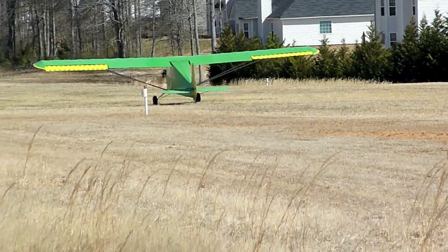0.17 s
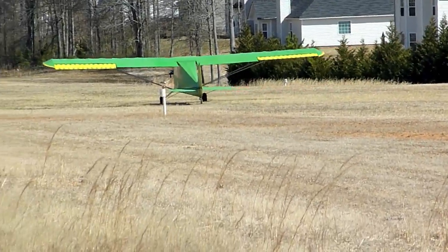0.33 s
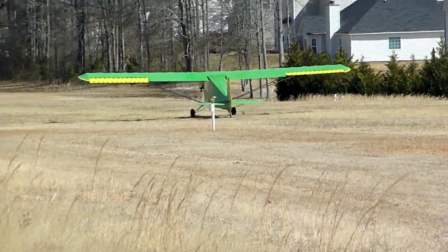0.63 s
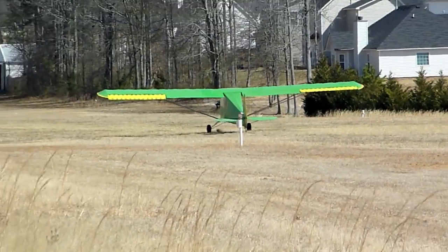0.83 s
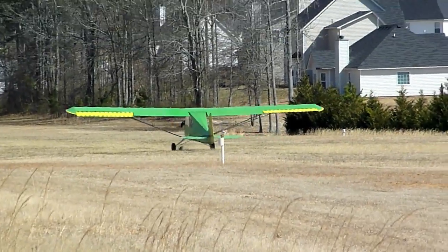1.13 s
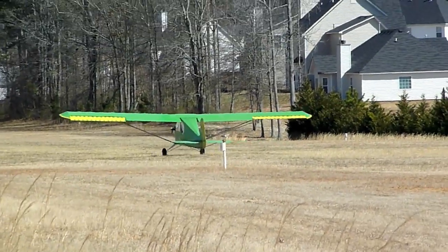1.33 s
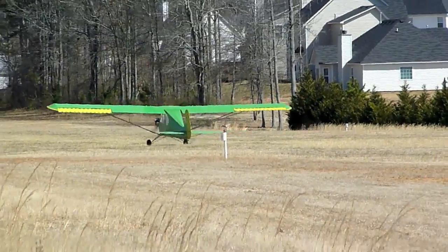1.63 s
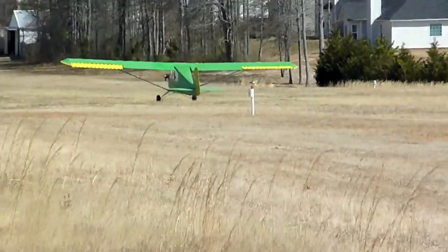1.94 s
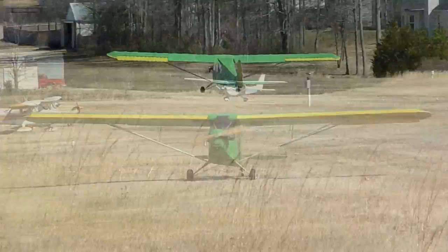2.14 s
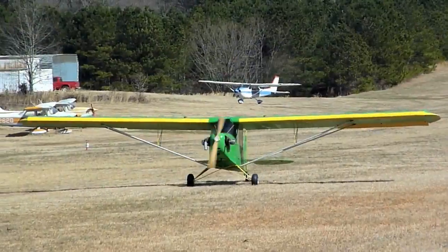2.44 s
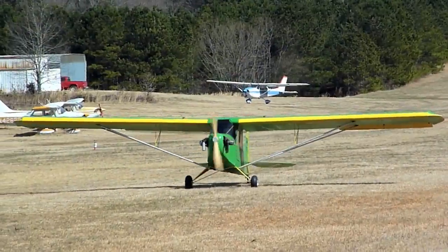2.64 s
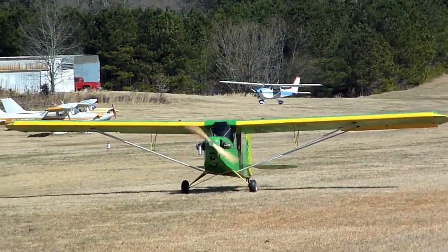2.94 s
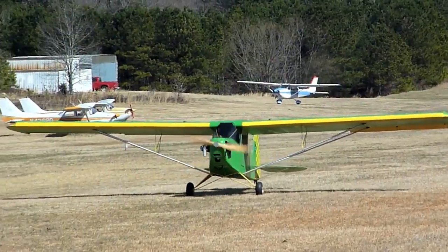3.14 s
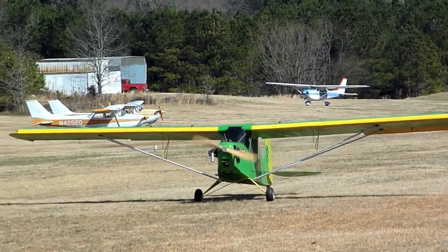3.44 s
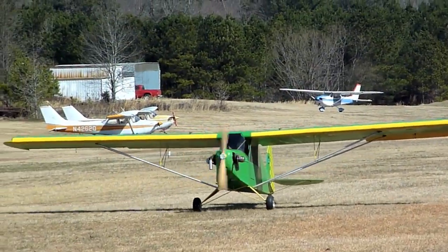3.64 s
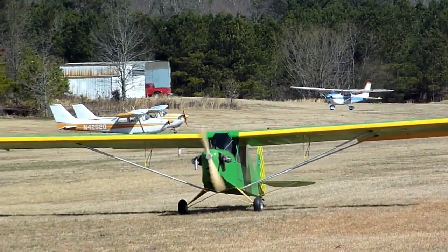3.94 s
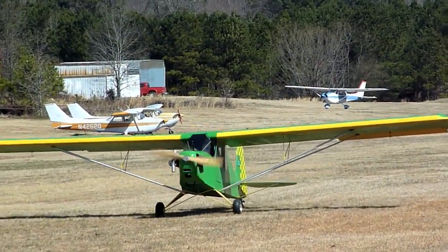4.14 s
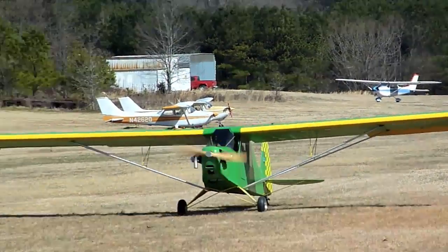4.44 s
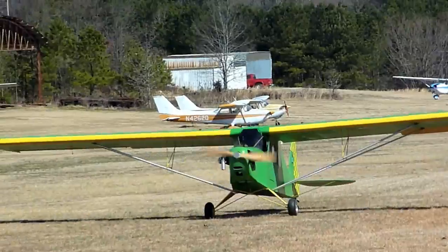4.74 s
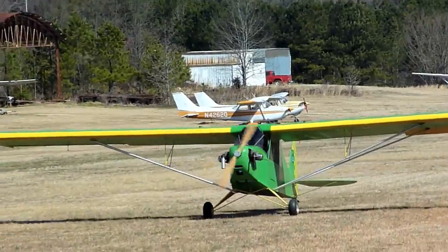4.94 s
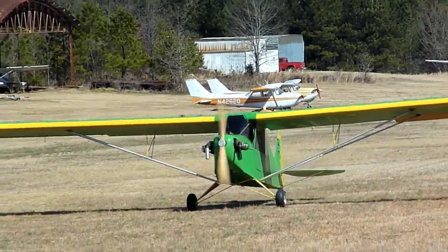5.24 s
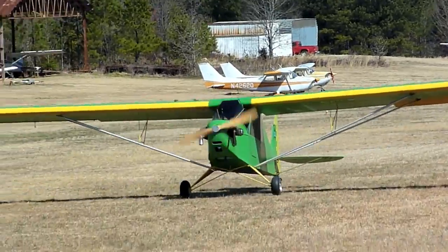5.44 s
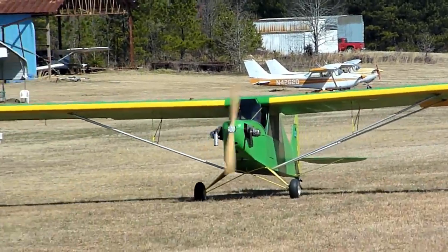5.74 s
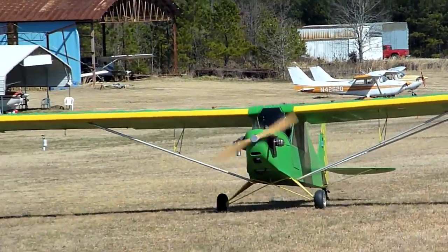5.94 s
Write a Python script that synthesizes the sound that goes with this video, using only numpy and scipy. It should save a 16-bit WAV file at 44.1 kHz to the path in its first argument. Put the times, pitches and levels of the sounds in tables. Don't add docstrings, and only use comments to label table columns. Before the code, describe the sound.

Outdoors on an open grass airstrip, a light propeller aircraft idles away, a dull, unsteady low throb with a few faint pops. After two seconds it blends into a close view: rapid clear chugging, spitting exhaust, ticking valve gear and pulsing propeller wash. The throttle opens slightly midway and the spits grow harder. Wind bumps the microphone and a sharp plastic click sounds close by.

```python
import sys
import numpy as np
from scipy import signal
from scipy.fft import rfft, irfft, next_fast_len
from scipy.io import wavfile
from scipy.ndimage import uniform_filter1d, map_coordinates

SR = 44100
rng = np.random.default_rng(int(sys.argv[2]) if len(sys.argv) > 2 else 0)


def wav_out(sig):
    wavfile.write(sys.argv[1], SR, np.round(np.clip(np.atleast_2d(sig).T, -1, 1) * 32767).astype(np.int16))


def volts(x):
    e = np.asarray(x, float) / 20
    return 10 ** e


N = 268994

# [t/s, firing rate/Hz]
FAR_SPEED = [(0.0, 31.84), (0.3, 28.45), (0.6, 27.76), (0.9, 27.4), (1.2, 27.25), (1.5, 27.13),
             (1.8, 27.16), (2.1, 26.9), (2.4, 26.44)]
NEAR_SPEED = [(2.0, 25.66), (2.3, 24.98), (2.6, 24.92), (2.9, 25.54), (3.2, 25.01), (3.5, 25.35),
              (3.8, 26.66), (4.1, 27.22), (4.4, 27.22), (4.7, 27.32), (5.0, 27.17), (5.3, 27.02),
              (5.6, 26.57), (5.9, 26.57), (6.1, 25.92)]
# [t/s, engine load level/dB, spit level/dB, sharpness (top edge against spit level)/dB]
NEAR_MOVES = [(2.4, -31.5, -45.5, -10), (2.62, -33.5, -36, -10.5), (2.88, -34, -34.5, -13),
              (3.05, -33, -38, -20), (3.3, -33, -42, -13.5), (3.6, -31.5, -38, -10),
              (3.85, -30.5, -36.5, -7), (4.16, -30.5, -35, -6.5), (4.4, -31, -34, -2.5),
              (4.55, -31, -35.5, -20), (4.75, -30, -31.5, -9), (4.95, -30.5, -28, -3.5),
              (5.2, -33, -27.5, -4.5), (5.3, -31.5, -28.5, -14.5), (5.7, -31.5, -29.5, -13.5),
              (5.9, -31, -32.5, -10), (6.1, -29.5, -30.5, -9)]
# [multiple of firing rate, level/dB]
FAR_ORDERS = [(2, -15), (3, -7), (4, -4), (5, -3), (6, -2), (7, 0), (8, -5), (9, -13), (10, -6), (11, -16),
              (12, -27), (13, -27), (14, -27)]
# [multiple of firing rate, slower idle level/dB, open throttle level/dB]
NEAR_ORDERS = [(2, -22, -22), (3, -12, -13), (4, -9, -6), (5, -5, -3), (6, 0, 0), (7, -2, 0), (8, -4, -3),
               (9, 0, -3), (10, -5, -3), (11, -3, -4), (12, -5, -8), (13, -2, -5), (14, -13, -11),
               (15, -20, -24), (16, -22, -22), (17, -29, -31), (18, -34, -37)]
# [t/s, extra level/dB]
HARD_SPITS = [(2.53, 4.5), (2.61, 2), (2.808, 4), (2.887, 3), (2.965, 5), (3.521, 5.5), (4.014, 1),
              (4.087, 2.5), (4.161, 5.5), (4.234, 2), (4.307, 2), (4.344, 3), (4.602, 2.5), (4.675, 2.5),
              (4.749, 3.5), (4.895, 4.5), (5.3, 3), (5.523, 4), (5.598, 1.5), (5.9, 6)]
# [t/s, level/dB]
STRAY_POPS = [
    (0.0119, -56),
    (0.0752, -54),
    (0.459, -60),
    (1.619, -65),
    (1.9, -63),
    (1.9783, -59.5),
]
# [f/Hz, level per Hz/dB]
SPIT_COLOUR = [(650, -81), (1100, 6), (1630, -12.5), (1890, 6.5), (2290, -2.5), (2680, 3.5), (3030, -1.5),
               (3800, 6), (4250, -3), (5760, -3), (6230, -2), (7990, -23), (13300, -35), (14800, -39),
               (16200, -54)]
# [f/Hz, level per Hz/dB]
CHURN_COLOUR = [(60, -40), (110, -8), (170, 0), (300, -4), (370, -10), (450, -21), (600, -45)]
# [f/Hz, level per Hz/dB]
WASH_COLOUR = [(400, 7), (520, -0.5), (800, 0.5), (950, -2), (1250, -2), (2000, -4), (2500, -5.5),
               (3700, -9), (4400, -10), (8000, -20.5), (14200, -30.5), (15300, -64)]
FIELD_COLOUR = [(250, -33), (420, 4.5), (480, -2), (650, -3), (950, -5.5), (1200, -4.5), (1500, -10),
                (2000, -11), (4000, -26.5), (5200, -32)]
# [f/Hz, left-right likeness]
WASH_ALIKE = [(300, 1), (700, 0.91), (1400, 0.84), (3500, 0.72), (7000, 0.73), (15000, 0.068)]
FIELD_ALIKE = [(60, 0.51), (180, 1), (550, 0.82), (1650, 0.19), (4970, -0.41), (15000, 0.048)]
# [f/Hz, level per Hz/dB]
AIR_COLOUR = [(1500, -39), (2500, -1.5), (7000, -7.5), (11000, -10.5), (14300, -13.5), (14900, -40)]
# [t/s, level over the breeze/dB]
GUSTS = [(.52, 9), (.77, 11.5), (1.86, 7), (2.63, 10), (2.74, 4.5), (3.0, 9), (3.47, 2.5), (4.95, -8),
         (5.3, 5), (5.56, 3.5), (5.96, 8.5)]
# [f/Hz, level per Hz/dB]
BUFFET_COLOUR = [(15, -30), (28, -4), (45, 1), (90, 4.5), (130, 1), (220, -15.5), (400, -61)]
# [f/Hz, level per Hz/dB]
SIZZLE_COLOUR = [(7900, -37), (8500, 0), (9000, -5), (10000, 1), (11000, -15), (11800, -40)]
# [t/s, peak level/dB, ring f/Hz, right against left level/dB, snap share]
CLICKS = [
    (2.032, -33, 1920, -1, 0.66),
    (3.8032, -14.5, 2250, 2, 0.17),
    (5.8984, -43, 1430, 8, 0.1),
]

FADE_S = 2.037, 2.67
THROTTLE_S = 3.52, 3.74


def far_aircraft():
    t = np.arange(N) / SR
    turns = turning(FAR_SPEED, first=.939)
    exhaust = whoops(turns, FAR_ORDERS, uneven_db=-13, flutter=.17, answer=.55)
    churn = rush(CHURN_COLOUR, [(80, .2), (140, .75), (220, .9)])
    churn = volts(-8) * filtered(churn, below(330, 6))
    engine_db = -37 - 1.34 * t + 0.93 * wobble(6.4)

    at = firings(turns, limp_s=-.0007)[1::2]
    pop_s, pop_db = np.transpose(STRAY_POPS)
    pops = np.round(pop_s * SR).astype(int)
    spit_db = np.maximum(-55.5 - 11.5 * at / SR, -71.5)
    spit = spits(np.r_[pops, at], np.r_[pop_db, spit_db], sharp_db=-16,
                 colour_hz=2340, colour_db=8.5, scatter_db=1.5)

    wash_db = -58.5 - 1.5 + 2.5 * abs(t - 1.1)
    wash = volts(wash_db) * rush(FIELD_COLOUR, FIELD_ALIKE)
    hiss = volts(-65.5) * rush(AIR_COLOUR, FIELD_ALIKE)
    return volts(engine_db) * (exhaust + churn) + spit + wash + hiss


def near_aircraft():
    load_db, spit_db, sharp_db = curves(NEAR_MOVES)
    clatter_db = -49 + 0.53 * (spit_db + 33)
    hiss_db = -62 + 0.22 * (spit_db + sharp_db + 43.5)

    turns = turning(NEAR_SPEED, first=.342)
    at = firings(turns, limp_s=-0.00046)
    exhaust = whoops(turns, NEAR_ORDERS, uneven_db=-12, flutter=.12, answer=.35)
    churn = volts(-12) * rush(CHURN_COLOUR, [(80, .1), (140, .6), (220, .9)])

    bank = np.arange(len(at)) % 2
    extra_db = sum(db * (abs(at / SR - s) < .012) for s, db in HARD_SPITS)
    size_db = spit_db[at] + 0.5 * bank + extra_db - 4.0
    spit_at = np.abs(at - round(.0012 * SR))
    spit = spits(spit_at, size_db, sharp_db[at], np.take((3430, 3800), bank), colour_db=7, scatter_db=0.5)

    engine = volts(load_db) * (exhaust + churn) + spit + valve_gear(at, clatter_db - 0.5)
    wash = propeller_wash(at, load_db - 19.5, clatter_db - 5.0, hiss_db)
    return (engine + wash) * volts([[-.4], [.4]])


def whoops(turns, orders, uneven_db, flutter, answer):
    out = np.zeros(N)
    opening = np.interp(np.arange(N) / SR, THROTTLE_S, (0, 1))
    for k, *db in orders:
        gain = volts(db[0]) + opening * (volts(db[-1]) - volts(db[0]))
        for m, share, shift in ((k, 1, 0), (k + .5, volts(uneven_db), rng.random())):
            lag = .0254 * (m - 2.28) ** 2 + .214 + shift
            lag -= np.angle(1 + answer * np.exp(-2j * np.pi * .44 * m)) / (2 * np.pi)
            size = 1 + flutter * wobble(16)
            slip = flutter * wobble(16)
            out += share * gain * size * np.cos(2 * np.pi * (m * turns - lag) + slip)
    return unit(out)


def spits(at, size_db, sharp_db, colour_hz, colour_db, scatter_db):
    luck = rng.standard_normal((len(at), 8))
    size_db = size_db + scatter_db * luck[:, 0]
    top_db = size_db + sharp_db - 0.5 + 2.6 * luck[:, 1]
    colour_hz = colour_hz * volts(1.78 * luck[:, 2])

    gas = filtered(rush(SPIT_COLOUR, [(1500, 0.84), (4000, 1.0), (12000, 0.77)]), ground)
    body = unit(filtered(gas, below(8500, 8)))
    edge = unit(filtered(gas, above(8500, 8)))
    out = edge * bursts(at, volts(top_db), 0.0015, 0.0052, hold=.0015)
    for k, band_hz in enumerate((1500, 2300, 3300, 4600, 6400)):
        band = filtered(body, lambda hz: np.exp(-(np.log((hz + 1) / band_hz) / 0.2) ** 2))
        favour_db = colour_db * np.exp(-(np.log(colour_hz / band_hz) / .22) ** 2)
        favour_db = favour_db + 2.3 * luck[:, 3 + k]
        band_db = size_db + favour_db - .5 * colour_db
        out += band * bursts(at, volts(band_db), 0.0014, 0.0052, hold=0.0015)
    return out


def valve_gear(at, level_db):
    gap = np.gradient(at)
    ticks = np.r_[at + .3 * gap, at + .73 * gap].astype(int)
    ticks = np.clip(ticks, 0, N - 1)
    size = volts(level_db[ticks] + 2.5 * rng.standard_normal(len(ticks)))
    covers = rush([(2200, -40), (3000, -6), (3700, 0), (4300, -12), (6000, -40)], [(3000, .9)])
    return covers * bursts(ticks, size, .005, .011)


def propeller_wash(at, low_db, middle_db, high_db):
    pulse = 1 + 1.37 * bursts(at, np.ones(len(at)), 0.0048, 0.0067)
    wash = filtered(pulse * rush(WASH_COLOUR, WASH_ALIKE), ground)
    low = unit(filtered(wash, below(1900, 6)))
    middle = unit(filtered(wash, lambda hz: above(1900, 6)(hz) * below(8000, 6)(hz)))
    high = unit(filtered(wash, lambda hz: above(8000, 6)(hz) * below(14400, 60)(hz)))
    return volts(low_db) * low + volts(middle_db) * middle + volts(high_db) * high


def ground(hz):
    wing = volts(-12) * np.exp(-2j * np.pi * hz * .00051)
    turf = volts(-11) * np.exp(-2j * np.pi * hz * .00131)
    return 1 - wing + turf


def turning(speed, first):
    running = np.arange(N) >= speed[0][0] * SR
    return np.cumsum(curves(speed)[0] * running) / SR - first


def firings(turns, limp_s):
    at = np.searchsorted(turns, np.arange(int(turns[-1]) + 1))
    limp = np.round(limp_s * SR * (-1) ** np.arange(len(at))).astype(int)
    return np.clip(at + limp, 0, N - 1)


def bursts(at, size, rise, fall, hold=0):
    t = np.arange(-600, 601) / SR
    shape = volts(-20 * np.maximum(np.maximum(-t / rise, (t - hold) / fall), 0))
    impulses = np.bincount(at, size, N)
    return signal.fftconvolve(impulses, shape, "same")


def clicks():
    out, t = np.zeros((2, N)), np.arange(400) / SR
    for s, db, ring_hz, right_db, snap in CLICKS:
        ring = np.cos(2 * np.pi * ring_hz * t - 1.2) + snap * rng.standard_normal(len(t))
        ring = ring * volts(-60 * t / .0026) * (1 - np.exp(-(t / .00016) ** 2))
        ring = ring + .35 * np.roll(ring, 55) + .25 * np.roll(ring, 72) + .1 * np.roll(ring, 200)
        ring = uniform_filter1d(ring, size=4)
        start = round(s * SR)
        out[0, start:][:len(t)] += 3 * volts(db) * ring
        out[1, start + 9:][:len(t)] += 3 * volts(db + right_db) * ring
    return out


def insects():
    t = np.arange(N) / SR
    late = t - 2.59
    heard = np.interp(t, (FADE_S[0], FADE_S[0] + 0.29), (0, 1))
    level_db = -62 - np.maximum(-15 * late, 40 * late)
    return heard * volts(level_db) * rush(SIZZLE_COLOUR, [(9000, 0.064)])


def wind():
    t = np.arange(N) / SR
    gust_db = -51 + sum(db * np.exp(-((t - s) / 0.076) ** 2) for s, db in GUSTS)
    lumps = volts(1.1 * np.array([wobble(9), wobble(8.3)]))
    buffet = rush(BUFFET_COLOUR, [(30, 0.2), (60, 0.13), (130, 0.05)])
    return volts(gust_db + 4.5) * unit(lumps * buffet)


def rush(spectrum, alike):
    def shape(hz):
        turn = np.arccos(np.clip(along(alike, hz), -1, 1)) / 2
        return volts(along(spectrum, hz)) * np.array([np.cos(turn), np.sin(turn)])
    mid, side = filtered(rng.standard_normal((2, N)), shape)
    return unit(np.array([mid + side, mid - side]))


def filtered(x, response):
    m = next_fast_len(N + SR // 2)
    return irfft(rfft(x, m) * response(np.fft.rfftfreq(m, 1 / SR)), m)[..., :N]


def below(edge_hz, steep):
    return lambda hz: 1 / (1 + (hz / edge_hz) ** steep)


def above(edge_hz, steep):
    return lambda hz: 1 / (1 + (edge_hz / (hz + 1)) ** steep)


def along(points, hz):
    f, v = np.transpose(points)
    return np.interp(np.log(hz + 1), np.log(f + 1), v)


def curves(rows):
    s, *cols = np.transpose(rows)
    return [np.interp(np.arange(N) / SR, s, c) for c in cols]


def wobble(rate):
    knots = rng.standard_normal(int(N * rate / SR) + 4)
    return map_coordinates(knots, [np.arange(N) * rate / SR])


def unit(x):
    return x / np.sqrt(np.mean(x ** 2) + 1e-20)


def scene():
    near = np.interp(np.arange(N) / SR, FADE_S, (0, 1))
    aircraft = (1 - near) ** 0.61 * far_aircraft() + near * near_aircraft()
    return aircraft + clicks() + insects() + wind()


def band_limit(x):
    return signal.sosfilt(signal.butter(12, 16390, fs=SR, output="sos"), x)


def record(dry):
    def gap_and_limit(hz):
        gap = 1 - 0.75 * np.exp(-((hz - 7950) / 110) ** 2)
        return gap * below(15500, 40)(hz)
    return band_limit(filtered(dry, gap_and_limit))


dry = scene()
out = record(dry)
wav_out(out)
```